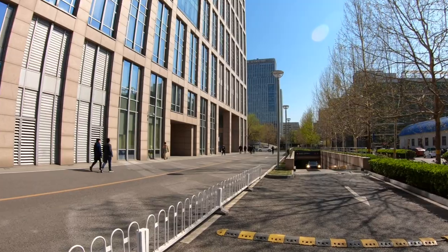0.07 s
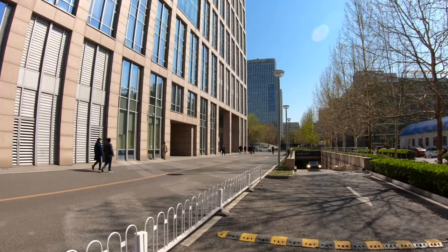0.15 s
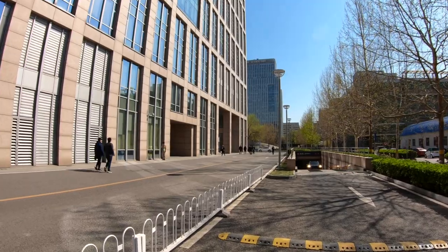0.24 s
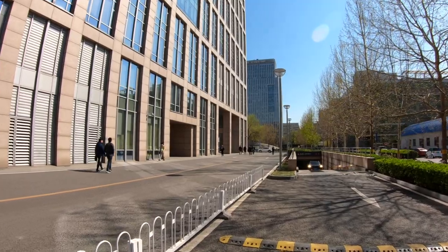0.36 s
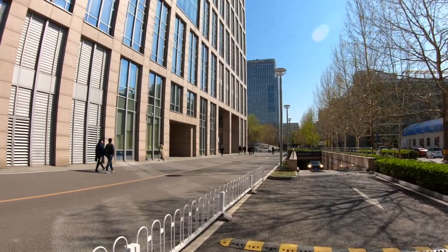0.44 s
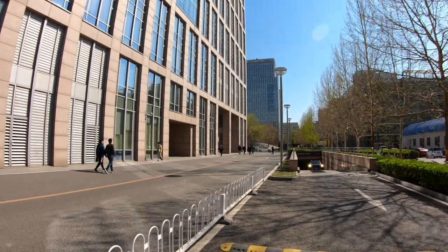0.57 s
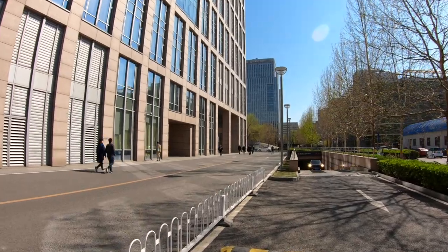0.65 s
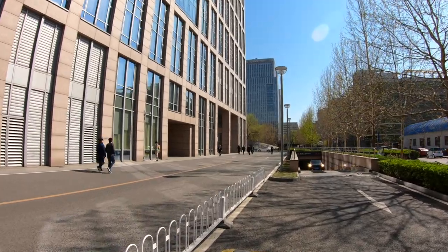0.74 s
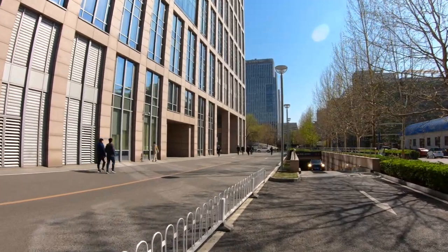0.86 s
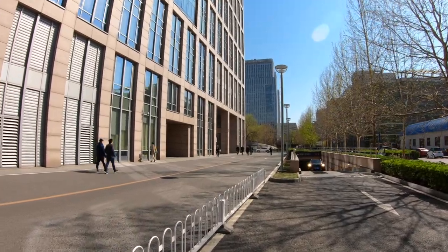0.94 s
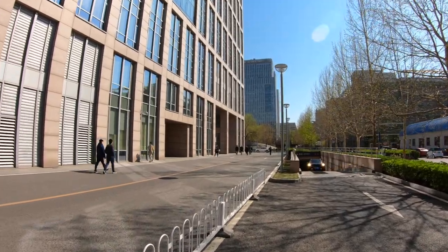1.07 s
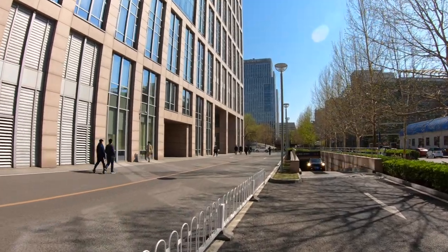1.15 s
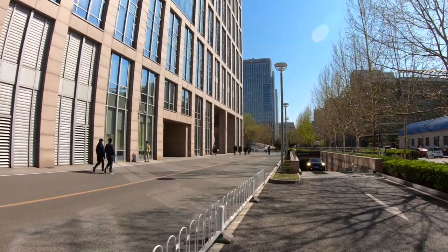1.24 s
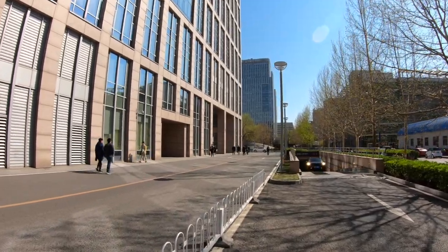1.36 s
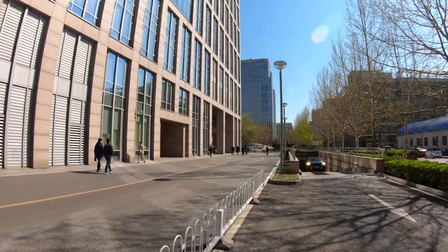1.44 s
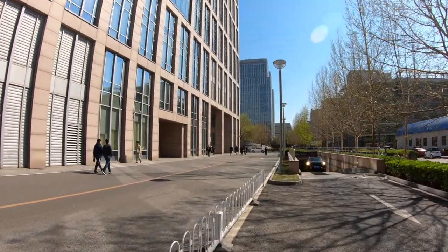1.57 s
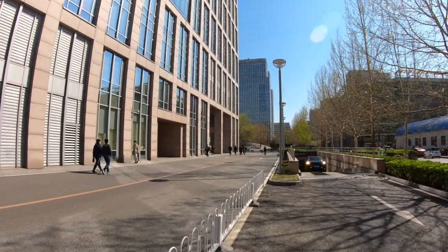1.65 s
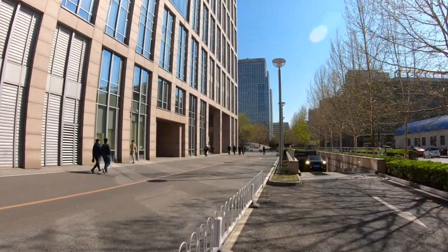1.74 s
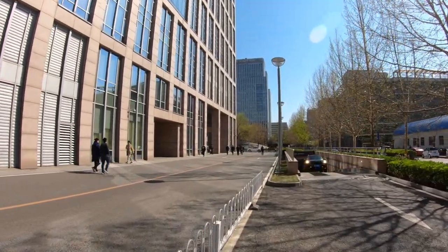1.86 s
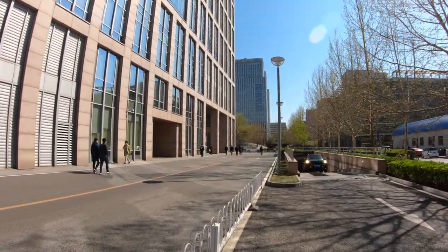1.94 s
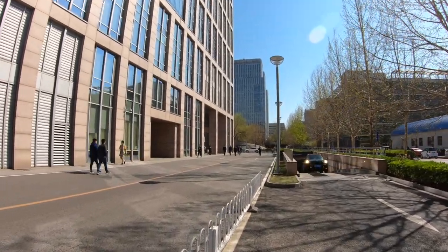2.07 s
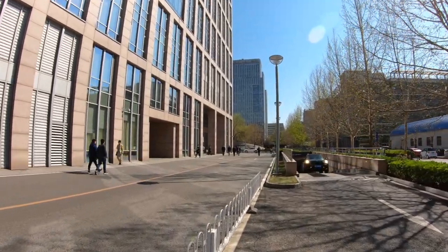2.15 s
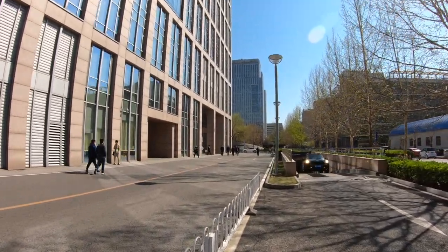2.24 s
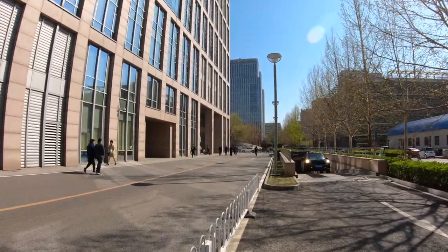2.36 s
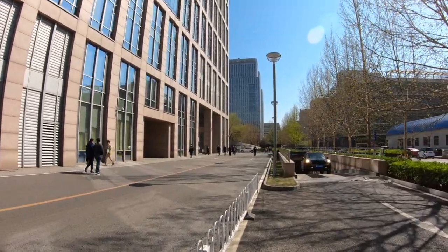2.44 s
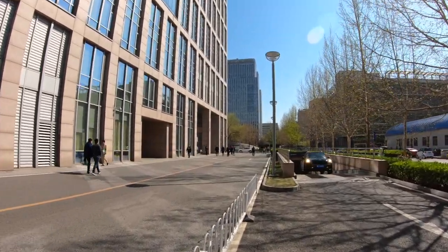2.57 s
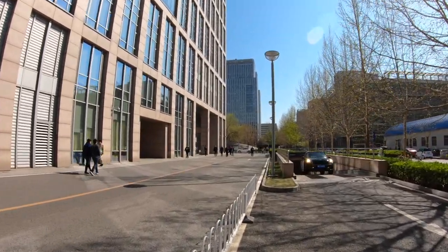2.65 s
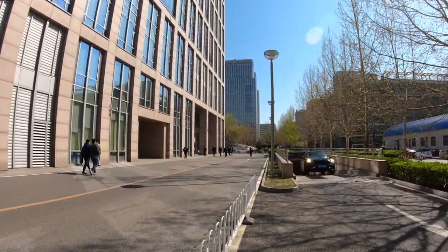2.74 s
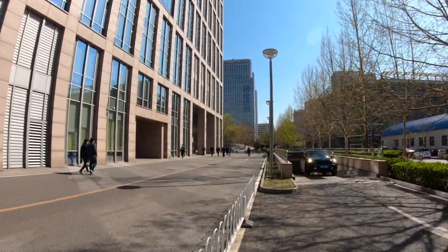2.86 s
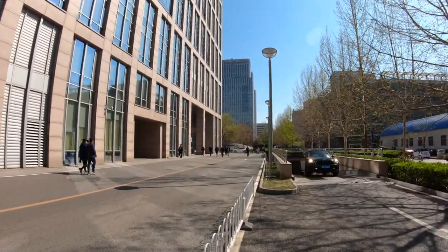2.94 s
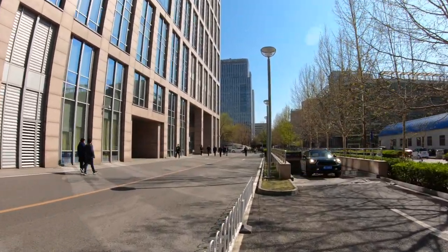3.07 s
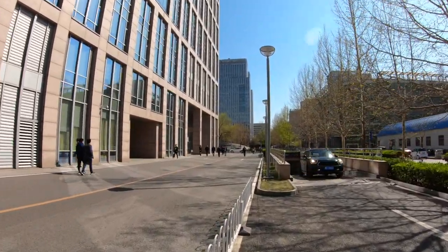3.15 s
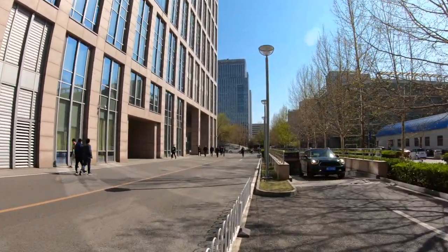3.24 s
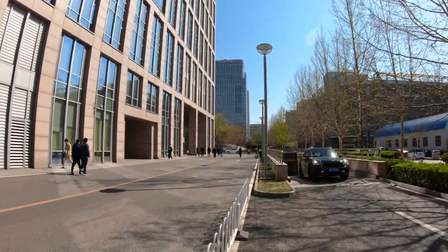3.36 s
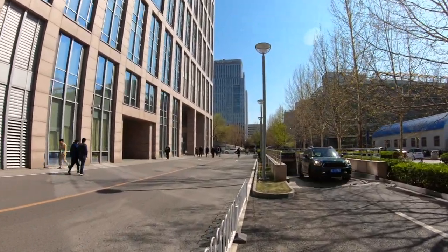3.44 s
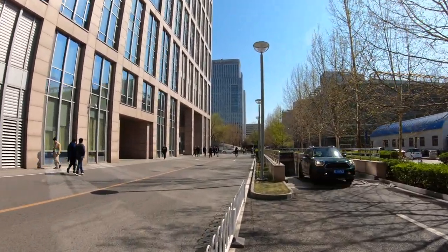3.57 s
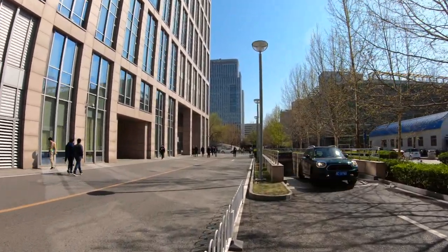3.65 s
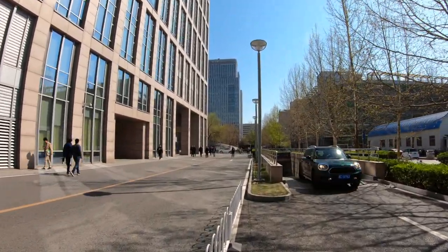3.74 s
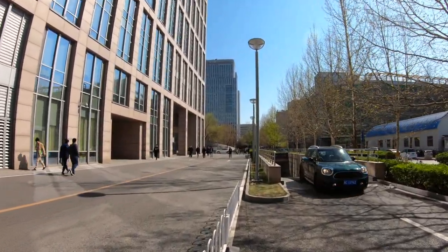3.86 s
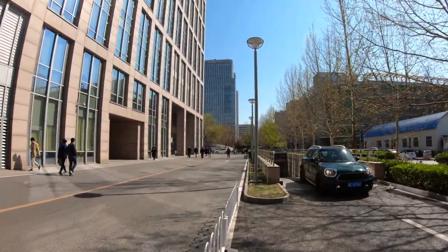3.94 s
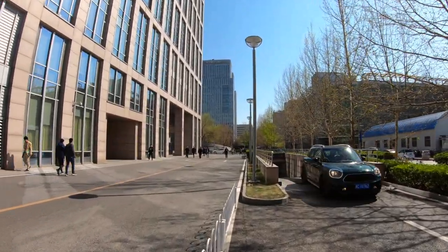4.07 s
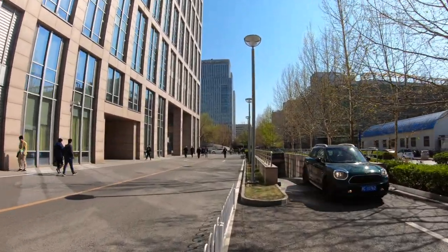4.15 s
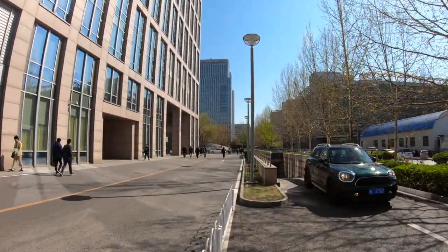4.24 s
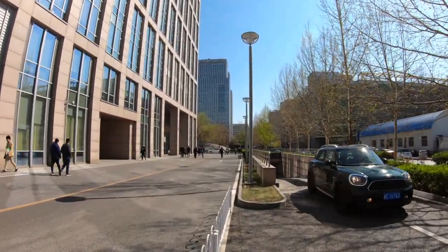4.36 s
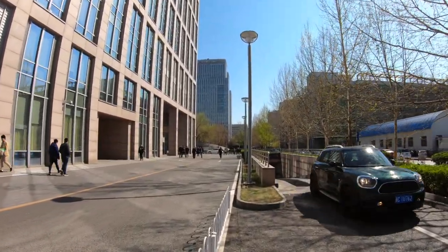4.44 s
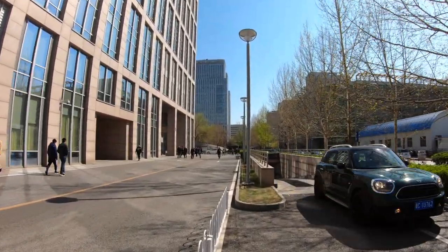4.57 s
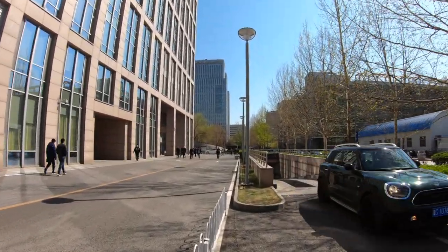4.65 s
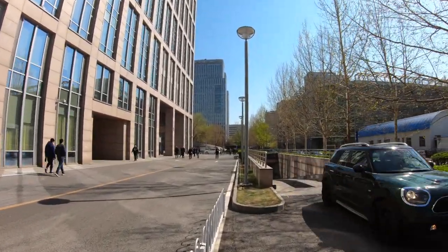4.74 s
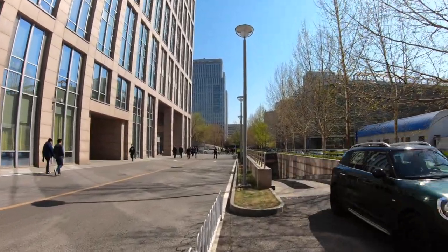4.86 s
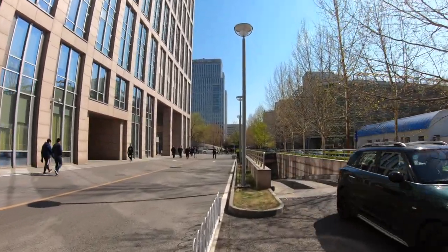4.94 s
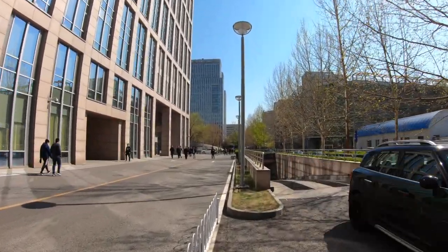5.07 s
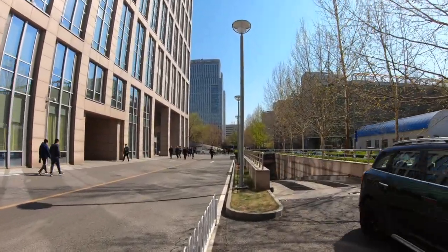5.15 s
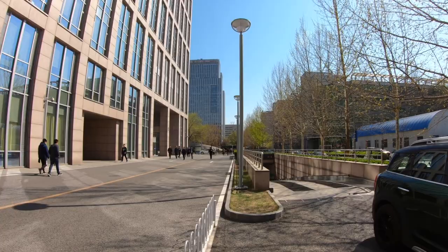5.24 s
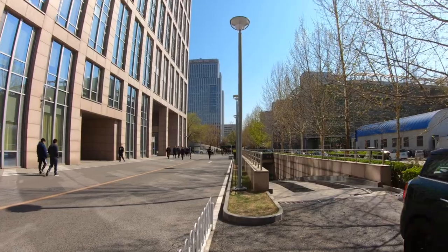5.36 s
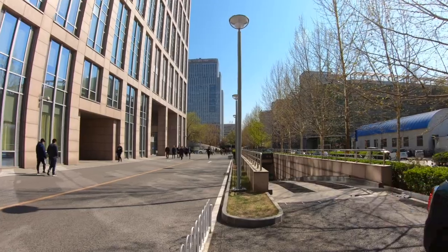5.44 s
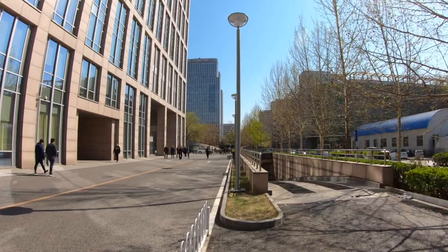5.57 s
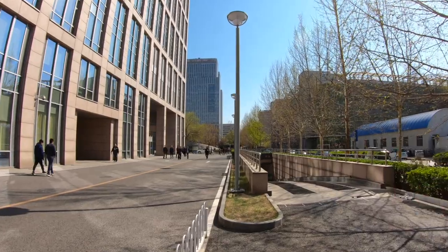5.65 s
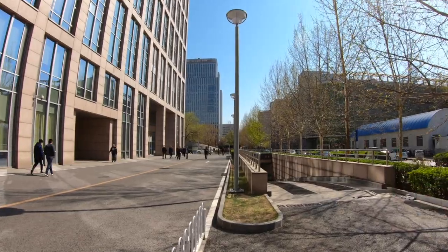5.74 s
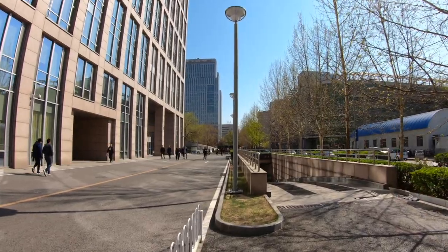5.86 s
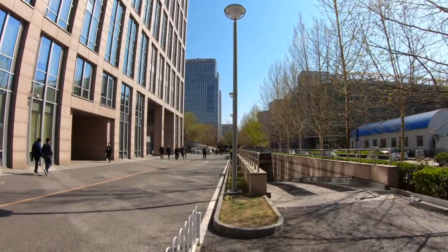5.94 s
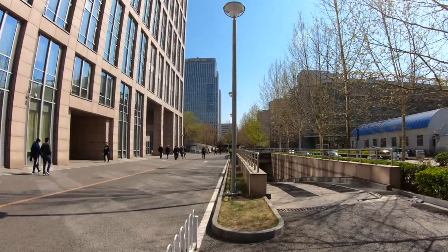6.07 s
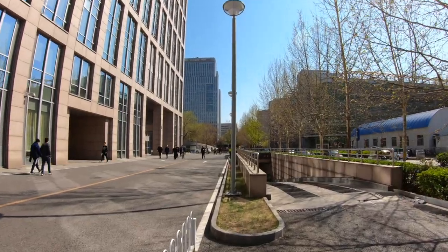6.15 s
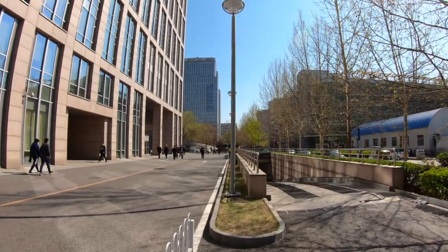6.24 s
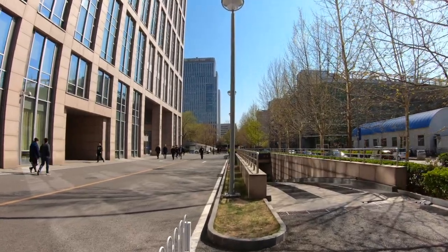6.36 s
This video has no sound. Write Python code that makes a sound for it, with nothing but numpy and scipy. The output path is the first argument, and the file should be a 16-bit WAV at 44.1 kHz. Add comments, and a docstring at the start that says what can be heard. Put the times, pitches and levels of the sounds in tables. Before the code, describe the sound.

A small car climbs from a garage ramp, engine ticking, then front and rear wheels bang loudly over a rattling speed bump and it drones away.

```python
"""A walled garage ramp by a city street: a small car climbs out, its engine labouring and ticking as
the revs sag. Front, then rear wheels thump over a speed bump whose loose segments clatter and rattle.
The car passes with a low exhaust drone, clunks over something further on and rattles faintly once more.
Engine: sines at multiples of the firing rate, puffs and ringing ticks. Road: coloured noise and grains.
Bump and clunks: decaying bursts through resonances. Walls: a short noise reverb. City: steady noise."""
import sys
import numpy as np
from scipy import signal
from scipy.fft import rfft, irfft, next_fast_len
from scipy.io import wavfile
from scipy.ndimage import map_coordinates

SR = 44100
rng = np.random.default_rng(int(sys.argv[2]) if len(sys.argv) > 2 else 0)


def file_out(sig):
    """Save sig as 16-bit WAV at sys.argv[1]."""
    # one column per channel
    cols = np.atleast_2d(sig).T
    # limit, then scale
    lim = np.clip(cols, -1, 1)
    pcm = np.round(lim * 32767).astype(np.int16)
    wavfile.write(sys.argv[1], SR, pcm)


N = 282537

# stages of the drive: (start s, end s)
EMERGING, CRESTING, PASSING, LEAVING = (0.52, 1.76), (3, 3.2), (3.6, 4.6), (5.58, 5.64)
CRUISE_DB = -50  # reference road level for the rumble and hiss

# loudness of tyres and engine air: t/s, level/dB
ROAD = [(0, -59), (.95, -58.5), (1.4, -56), (1.88, -55.5), (2.02, -52.5), (2.35, -48.5), (2.95, -49),
        (3.4, -45), (3.75, -50.5), (4.35, -53.5), (4.7, -50), (5.1, -48.5), (6, -52), (6.3, -56.5)]
# low rumble, car side-on: f/Hz, relative level/dB
RUMBLE_SIDE = [(15, -43), (35, -18), (55, -14), (80, -2), (150, 1.5), (220, -1.5), (270, 0), (325, -5),
               (450, -9), (800, -35.5), (2500, -100)]
# chatter of the bump under the front axle: f/Hz, relative level/dB
CLATTER_FRONT = [(240, -53.5), (400, -26.5), (690, -9), (840, -7.5), (1230, -4), (1450, -12), (1850, -7.5),
                 (2780, -5.5), (3050, 0), (5930, -18.5), (7220, -43), (9930, -32), (15000, -54)]
# front and rear wheels strike the bump:
# t/s, clatter/dB, hollow knock/dB, thump/dB, first touches relative to the strike/dB
AXLES = [(3.831, -13.5, -27.5, -15, -1.5), (4.459, -13.5, -16, -14.5, -11)]
# dull clunks further on: t/s, level/dB, t60/s
CLUNKS = [(5.832, -47, .06), (5.841, -29, 0.049), (5.928, -29, .08), (5.937, -32, 0.048),
          (5.948, -38, 0.26), (6.339, -38.5, 0.092)]


def amp(db):
    """Decibels to gain."""
    return np.exp(np.asarray(db) * np.log(10) / 20)


def unit(x):
    """Scale to rms 1."""
    return x / np.sqrt(np.mean(x ** 2) + 1e-20)


def along(points, hz):
    """(f/Hz, value) points read on a log frequency axis."""
    f, v = np.transpose(points)
    return np.interp(np.log(hz + 1), np.log(f + 1), v)


def curves(rows):
    """One value per sample for each column after the time."""
    s, *cols = np.transpose(rows)
    return [np.interp(np.arange(N) / SR, s, c) for c in cols]


def wobble(rate):
    """A smooth random curve, rate knots a second."""
    at = np.linspace(0, N * rate / SR, N // 64)
    knots = rng.standard_normal(int(at[-1]) + 4)
    return np.interp(np.arange(N) * rate / SR, at, map_coordinates(knots, [at]))


def filtered(x, response):
    """x through a response of frequency that keeps the power of white noise."""
    m = next_fast_len(N + SR // 2)
    h = response(np.fft.rfftfreq(m, 1 / SR))
    return irfft(rfft(x, m) * h / np.sqrt(np.mean(np.abs(h) ** 2)), m)[..., :N]


def coloured(x, spectrum):
    """x with a smooth spectrum of (f/Hz, level/dB)."""
    return filtered(x, lambda hz: amp(along(spectrum, hz)))


def resonant(x, peaks):
    """x through a body with (f/Hz, width/Hz, level/dB) resonances of alternating sign."""
    def response(f):
        h = 0
        for k, (centre, width, db) in enumerate(peaks):
            damping = 1j * f * width
            h = h + (-1) ** k * amp(db) * damping / (centre * centre - f * f + damping)
        return h
    return filtered(x, response)


def noise():
    """White noise of rms about 1."""
    return rng.standard_normal(N)


def grains(rate, spread_db):
    """Tiny random contacts, rate a second, of uneven size and either sign, rms 1."""
    where, size, way = rng.random((int(rate * N / SR), 3)).T
    push = np.sign(way - .5) * amp(spread_db * np.sqrt(12) * size)
    return unit(np.bincount((where * N).astype(int), push, N))


def add(track, s, sound):
    """Mix a sound into a track at a time."""
    part = track[max(round(s * SR), 0):][:len(sound)]
    part += sound[:len(part)]


def bursts(rows, attack):
    """Envelope of (t/s, level/dB, t60/s) blows, whose powers sum."""
    power, t = np.zeros(N), np.arange(SR // 3) / SR
    for s, db, t60 in rows:
        add(power, s, (amp(db - 60 * t / t60) * (1 - np.exp(-t / attack))) ** 2)
    return np.sqrt(power)


def ring(modes, vary_db, detune, attack, size):
    """One blow on (f/Hz, level/dB, t60/s) modes, each at a new strength and slightly new pitch."""
    hz, db, t60 = np.transpose(modes)[:, :, None]
    t = np.arange(size) / SR
    level, shift = rng.standard_normal((2, len(hz), 1))
    decay = amp(db + vary_db * level - 60 * t / t60)
    waves = decay * np.sin(2 * np.pi * hz * (1 + detune * shift) * t)
    return (-1) ** np.arange(len(hz)) @ waves * (1 - np.exp(-t / attack))


def stage(span):
    """Progress, 0 to 1, through a stage of the drive."""
    return np.clip((np.arange(N) / SR - span[0]) / (span[1] - span[0]), 0, 1)


def between(before, after, share):
    """Slide from one value to another."""
    return before + (after - before) * share


def blend(before, after, share):
    """Equal-power crossfade of two sounds."""
    return np.sqrt(1 - share) * before + np.sqrt(share) * after


def treble_db():
    """Level of the car's hiss: it follows the road, shaded by the garage and later by the car's own body."""
    level_db, growth = -54, 0.85  # growth: dB for each dB of the road
    garage_shade_db, behind_shade_db = 5.5, 4
    shade_db = garage_shade_db * (1 - stage(EMERGING)) + behind_shade_db * stage(LEAVING)
    return level_db + growth * (curves(ROAD)[0] - CRUISE_DB) - shade_db


def traffic():
    """The low, steady wash of the city: coloured noise with a slight swell."""
    # distant city: f/Hz, relative level/dB
    city_spectrum = [(20, -29), (50, -13.5), (90, -5), (160, -4), (250, 0), (400, -12), (700, -15.5),
                     (2000, -36), (6000, -70)]
    return amp(-55 + 1.2 * wobble(5)) * coloured(noise(), city_spectrum)


def firing_count():
    """Firings since the start, the engine speed summed over time; the revs waver a little."""
    # engine speed before the waver: t/s, firings a second
    revs = [(0, 50.6), (1.3, 51.2), (2.2, 48), (3, 46.1), (3.8, 41), (4.3, 34), (4.6, 35.7), (4.9, 39.5),
            (5.55, 43.6), (5.9, 43.6), (6.41, 42.7)]
    return np.cumsum(curves(revs)[0] * (1 + .004 * wobble(8))) / SR


def exhaust_drone(count):
    """Low multiples of the firing rate, their balance turning with the car."""
    # overall drone before the balance of its lines: t/s, level/dB
    drone_levels = [(.9, -65), (1.3, -52.5), (2, -58), (3.2, -47.5), (4.4, -54.5), (4.8, -55),
                    (5.15, -44.5), (5.35, -52), (5.6, -46), (5.78, -49.5), (6, -46), (6.3, -57.5)]
    # exhaust lines: multiple of the firing rate, garage mouth/dB, head-on/dB, side-on/dB
    line_levels = [(1, -16, -16, -20.5), (1.5, 1, -9, -18.5), (2, 2, -1.5, 0.5), (3, -0.5, -2, -6),
                   (4, -3, -11, 3), (5, -12, -13.5, -1.5), (6, -20, -18, -6.5), (8, -16, -17.5, -6)]
    drone_db, = curves(drone_levels)
    emerged, passed = stage(EMERGING), stage(PASSING)
    out = np.zeros(N)
    for multiple, deep_db, front_db, side_db in line_levels:
        db = drone_db + between(between(deep_db, front_db, emerged), side_db, passed)
        # the phase drifts at random, as wall echoes shift when the car moves
        phase = multiple * count + rng.random() + 0.037 * wobble(12)
        out += amp(db + 2.0 + 2.5 * wobble(9)) * np.sin(2 * np.pi * phase)
    return out


def rumble(flutter):
    """Low noise that grows with the road and flutters with the firings, turning head-on to side-on."""
    # low rumble, head-on: f/Hz, relative level/dB
    rumble_front = [(15, -49.5), (35, -19), (55, -12), (80, -5), (135, 1), (190, -3), (215, 4.5), (240, 1),
                    (270, 1.5), (320, -8), (450, -8.5), (800, -35), (2500, -100)]
    level_db, growth = -46, 0.69  # growth: dB for each dB of the road
    db = level_db + growth * (curves(ROAD)[0] - CRUISE_DB)
    front = coloured(noise() * flutter, rumble_front)
    side = coloured(noise() * flutter, RUMBLE_SIDE)
    return amp(db + 1.8 * wobble(14)) * blend(front, side, stage(PASSING))


def tyre_roar():
    """Dense tread contacts, as coloured grains, turning from head-on to side-on."""
    # tyre roar, head-on: f/Hz, relative level/dB
    roar_front = [(60, -50.5), (250, -20), (430, 2.5), (540, -0.5), (690, -2.5), (820, -7.5), (1100, -6.5),
                  (1400, -11), (2200, -23), (4500, -92.5)]
    # tyre roar, side-on: f/Hz, relative level/dB
    roar_side = [(60, -52.5), (250, -20), (430, 0), (570, -1), (780, 2), (980, 0), (1150, -5.5),
                 (1400, -9.5), (2200, -24), (6000, -89)]
    front = coloured(grains(rate=4000, spread_db=4), roar_front)
    side = coloured(grains(rate=4000, spread_db=4), roar_side)
    return amp(curves(ROAD)[0] + 1 + 0.74 * wobble(12)) * blend(front, side, stage(PASSING))


def hiss_and_scuffs(flutter):
    """Fluttering engine air and fine tyre hiss; tread scuffs swell both and crackle with grit."""
    # engine air in the garage mouth: f/Hz, relative level/dB
    hiss_deep = [(820, -29), (1400, -5.5), (2020, -5.5), (2450, -9), (2850, -13.5), (3110, -5), (3490, -15),
                 (4210, -20), (5000, -46), (7800, -85)]
    # engine air, head-on: f/Hz, relative level/dB
    hiss_front = [(820, -44), (1400, -12), (1720, 2), (2080, -7.5), (2350, 5.5), (2690, -9.5), (2940, -4),
                  (3450, -12.5), (3750, -9.5), (4240, -16.5), (4700, -25), (5120, -25.5), (6000, -32.5),
                  (7800, -65), (13200, -120)]
    # engine air, side-on: f/Hz, relative level/dB
    hiss_side = [(820, -18), (1400, -2), (1950, -0.5), (2310, -10), (2980, -6.5), (3360, -13), (4110, -19),
                 (5380, -23), (6000, -34), (7800, -60.5), (13200, -120)]
    # fine tyre hiss: f/Hz, relative level/dB
    fizz_spectrum = [(1500, -70.5), (3500, -21.5), (5500, 7.5), (8000, -3), (10500, -10), (12000, -20.5),
                     (15000, -32)]
    # grit crackle: f/Hz, relative level/dB
    grit_spectrum = [(1200, -35), (2500, 0), (4200, -1), (5200, -18), (9000, -33.5)]
    # tread scuffs: t/s, level of fine hiss/dB
    scuff_levels = [(1.13, -83), (2.3, -78.5), (2.89, -88), (3.47, -79)]
    scuff_width_s = 0.084
    fizz_front_db, fizz_side_db = -28, -22  # over the hiss
    hiss_db, passed = treble_db(), stage(PASSING)
    t = np.arange(N) / SR
    scuffing = sum(amp(db) * np.exp(-((t - s) / scuff_width_s) ** 2) for s, db in scuff_levels)

    deep, front, side = [coloured(noise() * flutter, spectrum)
                         for spectrum in (hiss_deep, hiss_front, hiss_side)]
    approaching = amp(-2.0) * blend(deep, front, stage(EMERGING))
    hiss = (amp(hiss_db) + amp(19) * scuffing) * blend(approaching, side, passed)
    fizz_db = hiss_db + between(fizz_front_db, fizz_side_db, passed)
    fizz = (amp(fizz_db) + scuffing) * coloured(noise(), fizz_spectrum)
    grit = amp(14) * scuffing * coloured(grains(rate=350, spread_db=4), grit_spectrum)
    return hiss + fizz + grit


def road(count):
    """Rumble, tyres and engine air; the rumble and air share a flutter at the firing rate."""
    flutter = unit((1 + 0.18 * np.cos(2 * np.pi * count)) * amp(1.9 * wobble(45)))
    return rumble(flutter) + tyre_roar() + hiss_and_scuffs(flutter)


def knocking(count):
    """Every firing ticks the engine block, the valves tick in between; under load some firings knock hard."""
    # the hardest engine knocks: t/s, relative level/dB
    hard_knocks = [(1.4169, -42), (1.5738, -38.5), (1.6125, -39), (1.9843, -35), (2.0265, -42),
                   (2.1374, -38), (2.2191, -36.5), (2.491, -34.5), (2.774, -33), (2.9027, -36.5),
                   (2.9899, -34), (3.1498, -32.5), (3.1947, -29), (3.2407, -29), (3.2884, -38),
                   (3.3114, -34), (3.4017, -36.5), (3.4279, -30), (3.451, -30), (3.4738, -26),
                   (3.5199, -33.5), (3.7508, -36)]
    # engine block: f/Hz, relative level/dB, t60/s
    block_modes = [(975, 3, 0.017), (1162, -4.5, 0.027), (1750, 0.5, 0.017), (2344, -3, 0.025),
                   (2552, -2.5, .028), (2942, -3, 0.028), (3153, -8, 0.019), (4115, -1, .018),
                   (4545, -4.5, 0.011)]
    tick_front_db, tick_side_db, tick_garage_db = 7.5, -5.5, 5  # over the hiss; lost in the garage mouth
    # the block's outer modes: (dB behind the ramp's crest, dB in plain view)
    low_ring_db, high_ring_db = (-10.5, -2.5), (-22, -8.5)

    out = np.zeros(N)
    beats = np.flatnonzero(np.diff(np.floor(2 * count)))  # two ticks a firing
    size, late, low, high = rng.standard_normal((len(beats), 4)).T
    ticking_db = treble_db() + between(tick_front_db, tick_side_db, stage(PASSING))
    ticking_db -= tick_garage_db * (1 - stage(EMERGING))
    softer_db = 6 * (np.arange(len(beats)) % 2)  # every other tick
    tick_db = ticking_db[beats] + 5.9 * np.clip(size, -2, 1.5) - softer_db
    ticks = zip(beats / SR + 0.0016 * late, tick_db, -11 + 3 * low, -14 + 4 * high)
    knocks = [(s, db, np.interp(s, CRESTING, low_ring_db), np.interp(s, CRESTING, high_ring_db))
              for s, db in hard_knocks]

    hz, level, t60 = np.transpose(block_modes)
    is_low, is_high = hz < 2000, hz > 3600
    for s, db, low_db, high_db in [*knocks, *ticks]:
        modes = np.transpose([hz, level + low_db * is_low + high_db * is_high, t60])
        add(out, s, amp(db + 1) * ring(modes, vary_db=3, detune=0.03, attack=.0006, size=1100))
    return out


def contacts():
    """Every axle touches, climbs, strikes, rolls over and drops: (t/s, clatter/dB, hollow knock/dB, thump/dB)."""
    # contacts around a strike: t after the strike/s, clatter/dB, hollow knock/dB, thump/dB
    contact_steps = [(-.039, -2.5, -1.5, -5.5), (-.023, 1.5, -6.5, -6.5), (0, 2.5, 0.5, 1),
                     (.012, -8, -3, -23.5), (.023, -6.5, -9, 1.5), (.04, -20, -20, -11.5)]
    rows = []
    for *axle, touch_db in AXLES:
        for step in contact_steps:
            is_first_touch = step[0] < -.01
            rows.append(np.add(axle, step) + touch_db * is_first_touch * np.array([0, 1, 1, 1]))
    return np.array(rows)


def rattling():
    """Envelope of the rattling loose parts: a quick rise, a sagging hold, then they settle."""
    # loose parts rattle from each axle's first touch, and once more, faintly, further on:
    # t/s, level/dB, hold/s
    rattle_levels = [(3.78, -21, .235), (4.441, -23, .19), (6.372, -42, .2)]
    attack_s, sag_db_per_s, stop_db_per_s = .012, 25.5, 162  # the stop adds to the sag
    out = np.zeros(N)
    for s, db, hold in rattle_levels:
        age = np.maximum(np.arange(N) / SR - s, 0)
        fall_db = sag_db_per_s * age + stop_db_per_s * np.maximum(age - hold, 0)
        out += amp(db - fall_db) * (1 - np.exp(-age / attack_s))
    return out


def bump():
    """Each blow makes the segments chatter against the road; loose parts rattle from the first touch."""
    # a lifted segment slaps back on the road: t/s, clatter/dB
    slap_levels = [(3.930, -16), (4.013, -26.5), (4.567, -28.5), (4.634, -34)]
    # chatter under the rear axle: f/Hz, relative level/dB
    clatter_rear = [(240, -49), (400, -16), (593, -7), (711, -4), (934, -16), (1640, -1), (2740, -25),
                    (3000, -17.5), (4320, -17), (10100, -40), (15000, -58)]
    # cavity under the bump: f/Hz, width/Hz, relative level/dB
    cavity = [(573, 87, -3.5), (704, 39, 1), (763, 56, -8.5), (1020, 220, -9.5)]
    # rattle of loose parts: f/Hz, relative level/dB
    rattle_spectrum = [(180, -52.5), (300, -19.5), (726, -25.5), (854, -29), (1200, -7), (1440, -9.5),
                       (1670, 0), (2430, -5), (2770, -6.5), (3110, -7.5), (3490, -13), (4760, -16),
                       (9610, -31.5), (12900, -48), (15000, -52.5)]
    # ring of the bump: f/Hz, width/Hz, relative level/dB
    segment_modes = [(1213, 55, -7), (1405, 50, -8), (1607, 28, 0), (1790, 87, 0.5), (1910, 45, 1),
                     (2260, 83, -2), (2337, 51, 4.5), (2520, 50, -0.5), (2983, 33, 1), (3320, 45, 2.5),
                     (3655, 42, -5), (3960, 40, -3), (4380, 29, -7.5)]
    contact_t60_s, slap_t60_s = 0.099, 0.082
    slap_hollow_db = -22  # hollow knock relative to the clatter

    blows = [(s, clatter_db, hollow_db, contact_t60_s) for s, clatter_db, hollow_db, _ in contacts()]
    slaps = [(s, db, db + slap_hollow_db, slap_t60_s) for s, db in slap_levels]
    s, clatter_db, hollow_db, t60 = np.transpose(blows + slaps)
    chatter = bursts(zip(s, clatter_db, t60), attack=.001) * grains(rate=3000, spread_db=2.0)
    front = np.arange(N) / SR < 4.3  # before the rear axle arrives
    clatter = amp(-2) * coloured(chatter * front, CLATTER_FRONT)
    clatter += amp(-5) * coloured(chatter * ~front, clatter_rear)
    knock = bursts(zip(s, hollow_db, t60), attack=0.0011) * noise()
    hollow = amp(-2.5) * resonant(knock, cavity)
    shaking = rattling() * amp(1.7 * wobble(90)) * grains(rate=3500, spread_db=1.0)
    rattle = amp(-0.5) * coloured(shaking, rattle_spectrum)
    ringing = resonant(amp(-5.0) * chatter + amp(-20) * shaking, segment_modes)
    return clatter + hollow + rattle + ringing


def squeeze():
    """Each tyre scrunches and booms as it presses into the rubber just before it strikes."""
    scrunch_db, boom_db = -33.5, -33.5
    lead_s, rise_s = .04, 0.009  # peak before the strike; rise and fall time
    t = np.arange(N) / SR
    swell = sum(np.exp(-np.abs(t - s + lead_s) / rise_s) for s, *_ in AXLES)
    scrunch = amp(scrunch_db) * coloured(grains(rate=2600, spread_db=2.5), CLATTER_FRONT)
    boom = amp(boom_db) * coloured(noise(), RUMBLE_SIDE)
    return swell * (scrunch + boom)


def thumps():
    """Soft rubber contacts, and later the clunks, boom in wheel and body."""
    # wheel and body: f/Hz, relative level/dB, t60/s
    wheel_modes = [(90.5, -12, 0.064), (134.8, 1.5, 0.07), (169.4, -1, 0.078), (243.4, -6, 0.074)]
    out = np.zeros(N)
    jolts = [(s, db - 1) for s, db, _ in CLUNKS]  # boom 1 dB below its clunk's level
    for s, db in [*contacts()[:, [0, 3]], *jolts]:
        add(out, s, amp(db) * ring(wheel_modes, vary_db=1.5, detune=0.013, attack=0.0016, size=8000))
    return out


def brake_squeaks():
    """Faint brake squeaks: short noise bursts through one narrow high resonance."""
    # squeaks: t/s, level/dB, t60/s
    squeak_levels = [(4.715, -65, 0.074), (4.888, -63, .06), (4.972, -58, 0.052), (5.012, -65, .14),
                     (5.1, -67, 0.087)]
    return resonant(bursts(squeak_levels, attack=.004) * noise(), [(7650, 130, 0)])


def exhaust_puffs(count):
    """Each firing puffs in the tailpipe as the car pulls away: a hard start, then weak uneven puffs."""
    # tailpipe: f/Hz, relative level/dB, t60/s
    pipe_modes = [(119, -2.5, 0.036), (208, 0, 0.026), (302, -3, 0.028)]
    pull_away_s, puffing_s = 5.078, .6
    first_db, fade_db_per_s, late_db, vary_db = -24, 70, -43.5, 4
    out = np.zeros(N)
    start = round(pull_away_s * SR)
    firings = np.floor(count[start:] - count[start])[:round(puffing_s * SR)]
    for age in np.flatnonzero(np.diff(firings, prepend=-1)) / SR:
        db = max(first_db - fade_db_per_s * age, late_db + vary_db * rng.standard_normal())
        puff = ring(pipe_modes, vary_db=3.5, detune=0.041, attack=0.0012, size=3000)
        add(out, pull_away_s + age, amp(db) * puff)
    return out


def clunks():
    """Dull knocks and chattering chinks of loose metal as the car rolls on, as shaped noise bursts."""
    # dull knock: f/Hz, relative level/dB
    clunk_spectrum = [(25, -43.5), (60, -20), (150, -4.5), (350, 3), (750, -6), (1000, -17.5), (1350, -11),
                      (1900, -32.5), (5000, -55), (12000, -100)]
    # light metal chinks: t/s, level/dB, t60/s
    chink_levels = [(5.877, -34, 0.054), (5.897, -45.5, 0.086), (5.916, -44.5, .08), (5.944, -45.5, 0.11),
                    (6.366, -48, 0.18), (6.388, -37, .15)]
    # loose metal: f/Hz, width/Hz, relative level/dB
    metal_modes = [(3248, 130, -8.5), (4270, 110, 2), (4790, 150, -10), (5310, 85, -2), (6400, 110, -13),
                   (7200, 100, -9.5), (9230, 180, -17.5), (10170, 250, -21.5), (12500, 700, -30)]
    scrape_spectrum = [(500, -60), (1500, -19), (3000, 4), (4400, 7), (7000, -13), (13000, -20.5), (15000, -30)]
    knocks = coloured(bursts(CLUNKS, attack=0.00078) * noise(), clunk_spectrum)
    chatter = bursts(chink_levels, attack=0.0021) * noise()
    chinks = amp(-0.5) * resonant(chatter, metal_modes)
    scrape = amp(-7) * coloured(chatter, scrape_spectrum)
    return knocks + chinks + scrape


def street(x):
    """The facade and ramp walls answer with a noise tail, the treble dying first."""
    # wall echo: f/Hz, t60/s
    street_decay = [(150, 0.49), (2000, 0.34), (10000, 0.27)]
    hz, t, z = signal.stft(rng.standard_normal(SR // 2), SR, nperseg=256)
    fade = amp(-60 * t / along(street_decay, hz)[:, None])
    tail = signal.istft(z * fade, SR, nperseg=256)[1]
    return signal.fftconvolve(x, tail / np.linalg.norm(tail))[:N]


def scene():
    """The whole car, heard alike in both channels; only its hits reach the walls."""
    count = firing_count()
    engine = exhaust_drone(count) + exhaust_puffs(count)
    hits = knocking(count) + bump() + squeeze() + thumps() + brake_squeaks() + clunks()
    mono = traffic() + engine + road(count) + hits + amp(-13.5) * street(hits)
    return np.array([mono, mono])


def record(dry):
    """Round off the tallest peaks and keep nothing above the band limit."""
    top_hz = 14800
    soft = dry / (1 + (dry / .55) ** 4) ** .25
    m = next_fast_len(N + SR // 2)
    return irfft(rfft(soft, m) * (np.fft.rfftfreq(m, 1 / SR) < top_hz), m)[:, :N]


dry = scene()
out = record(dry)
file_out(out)
```